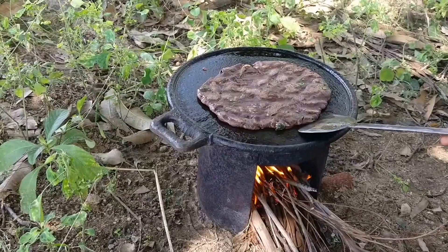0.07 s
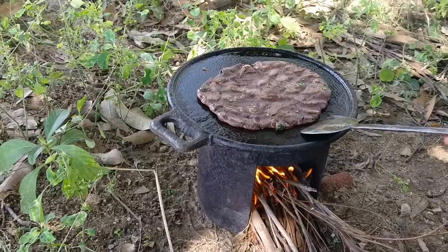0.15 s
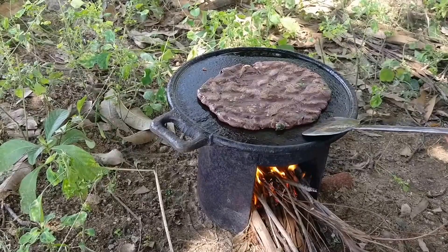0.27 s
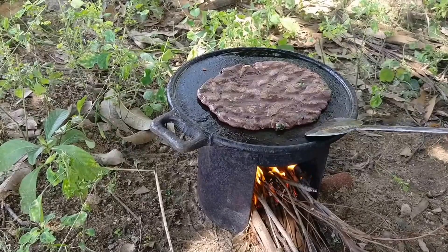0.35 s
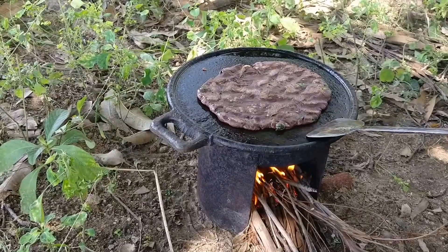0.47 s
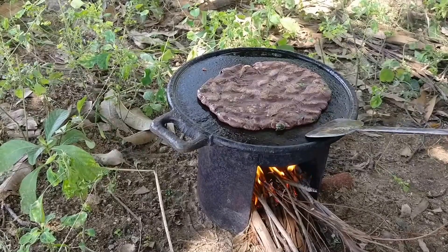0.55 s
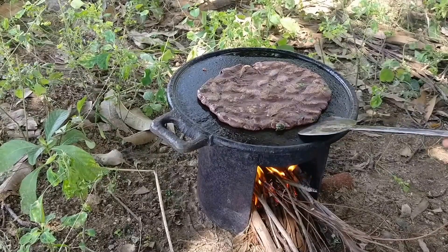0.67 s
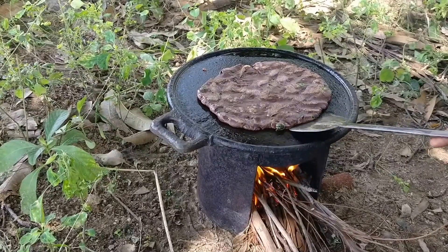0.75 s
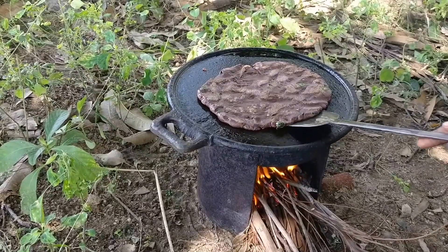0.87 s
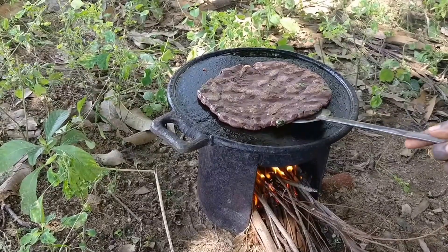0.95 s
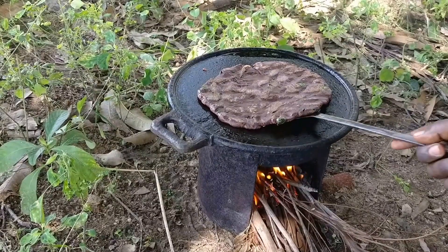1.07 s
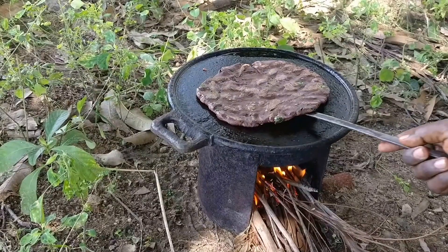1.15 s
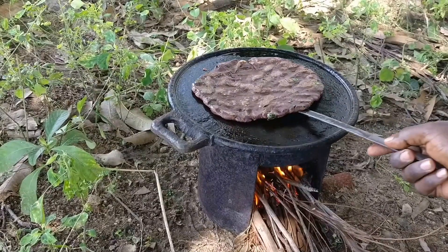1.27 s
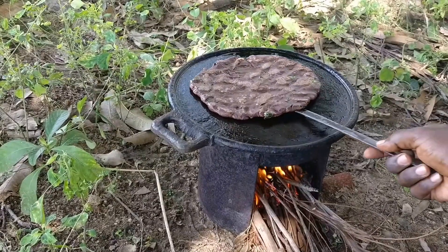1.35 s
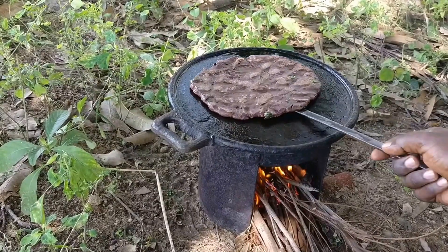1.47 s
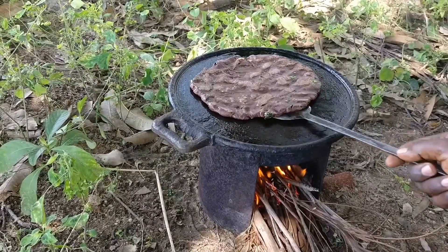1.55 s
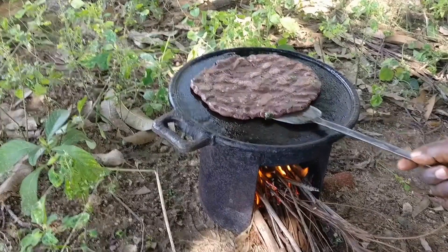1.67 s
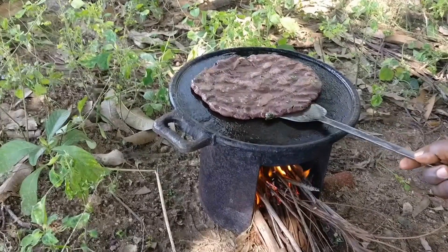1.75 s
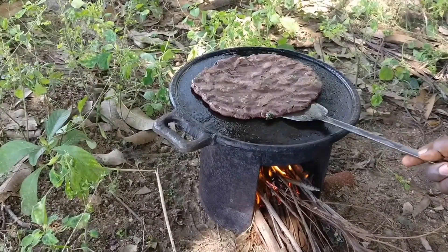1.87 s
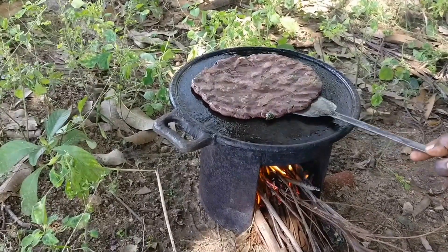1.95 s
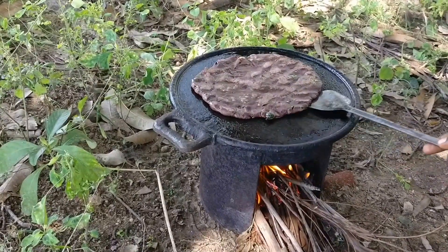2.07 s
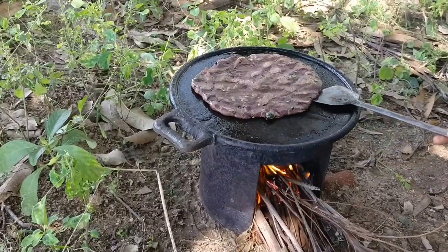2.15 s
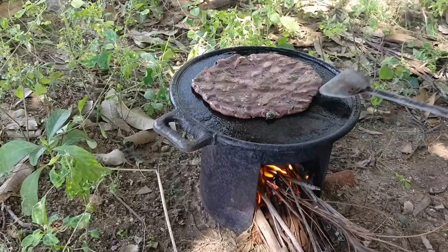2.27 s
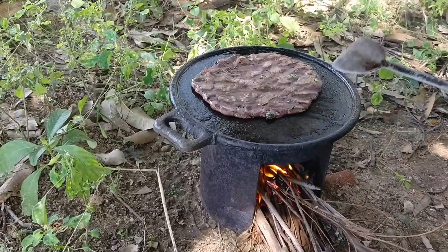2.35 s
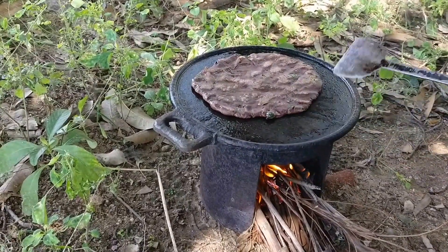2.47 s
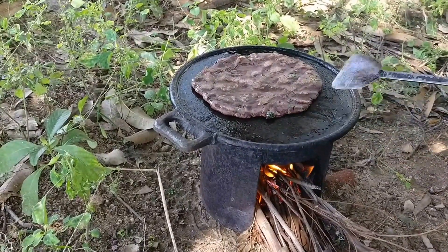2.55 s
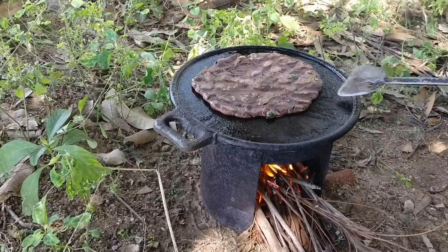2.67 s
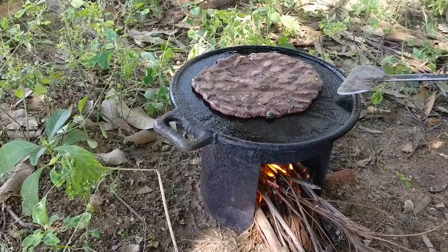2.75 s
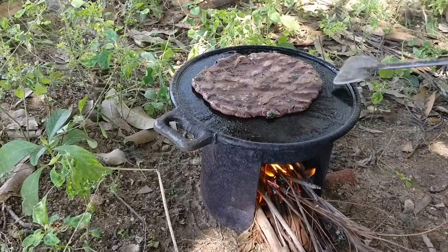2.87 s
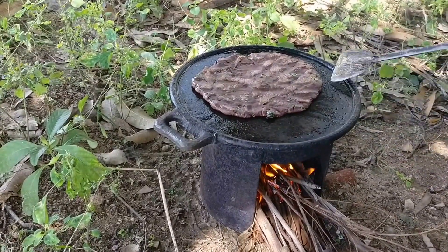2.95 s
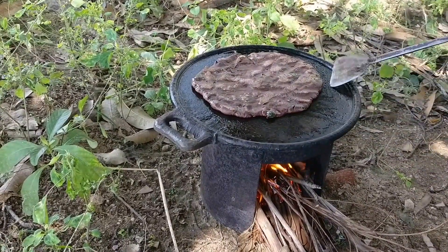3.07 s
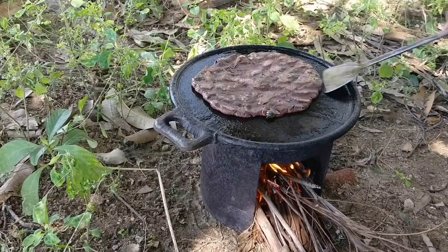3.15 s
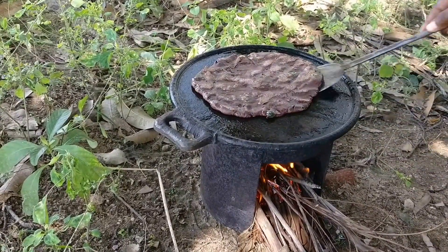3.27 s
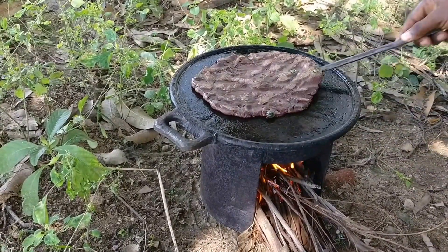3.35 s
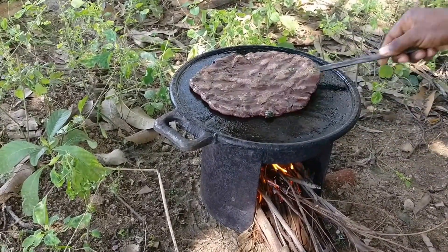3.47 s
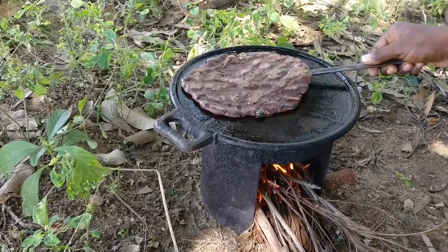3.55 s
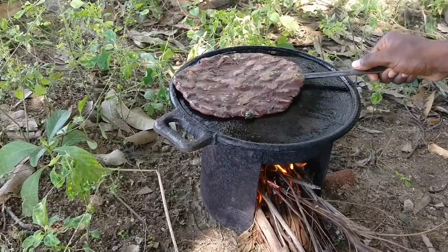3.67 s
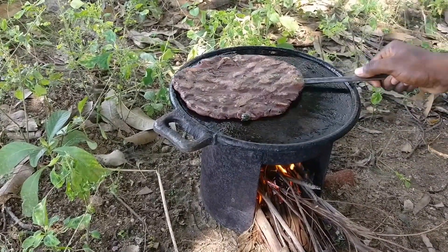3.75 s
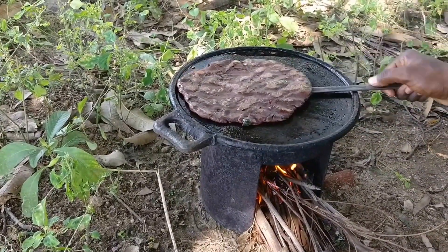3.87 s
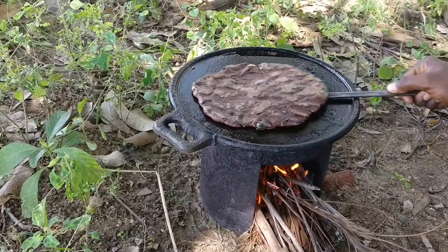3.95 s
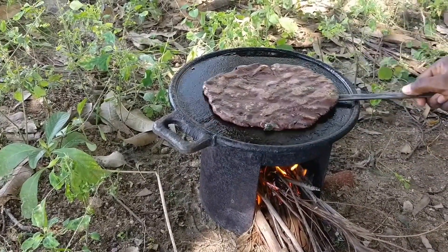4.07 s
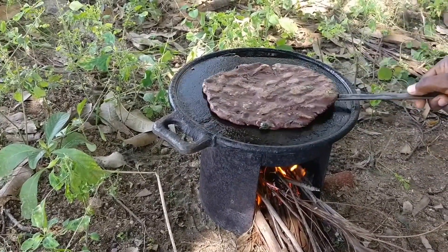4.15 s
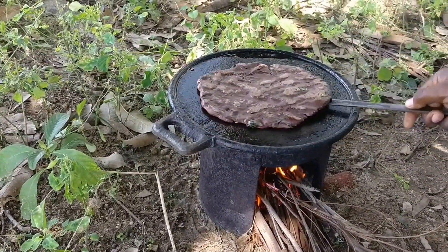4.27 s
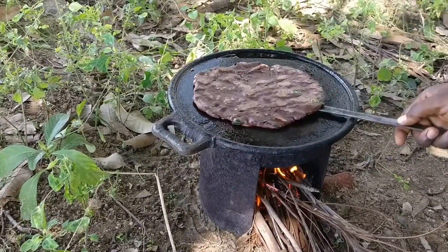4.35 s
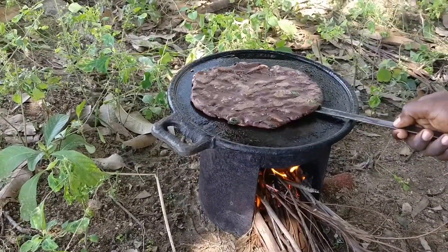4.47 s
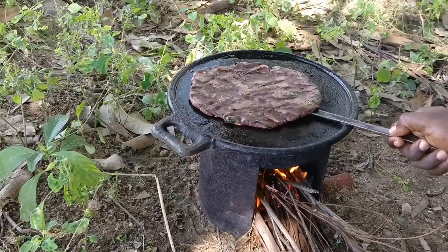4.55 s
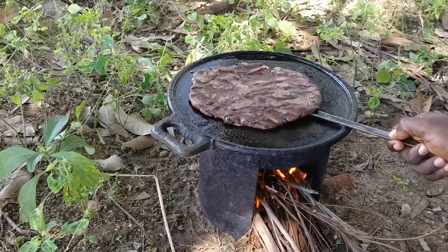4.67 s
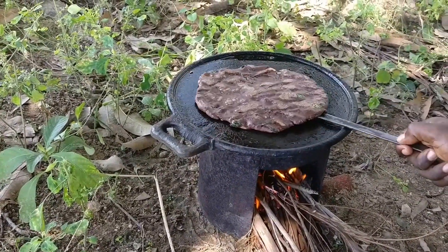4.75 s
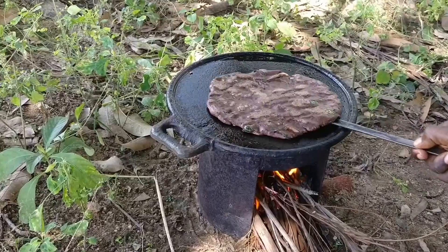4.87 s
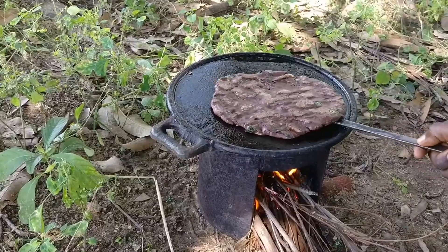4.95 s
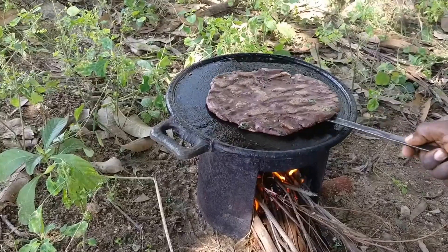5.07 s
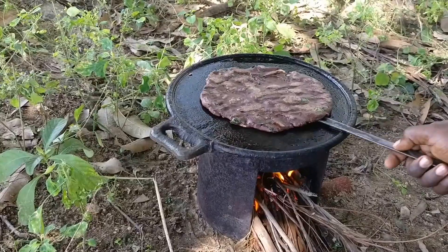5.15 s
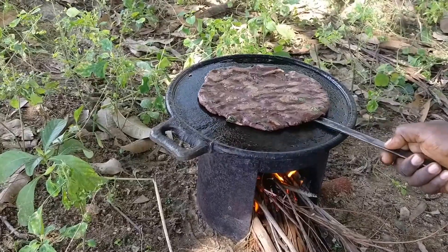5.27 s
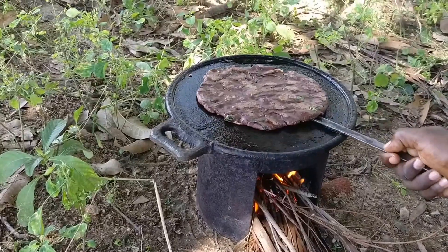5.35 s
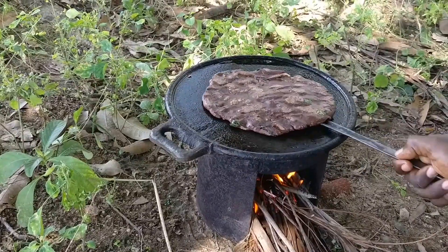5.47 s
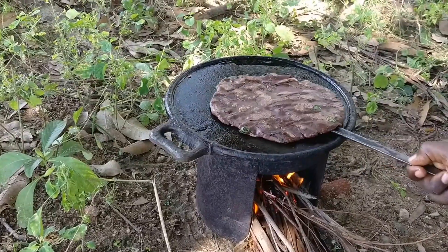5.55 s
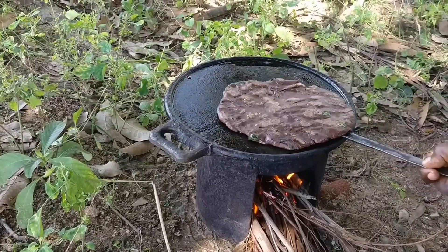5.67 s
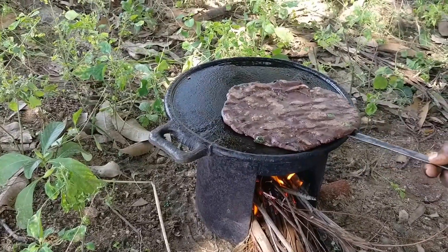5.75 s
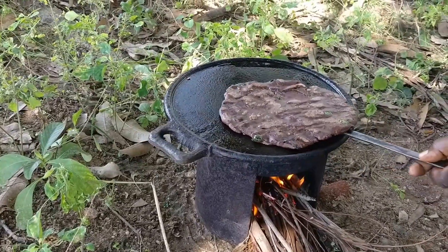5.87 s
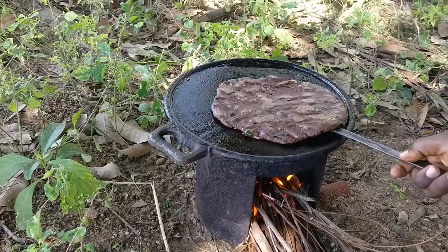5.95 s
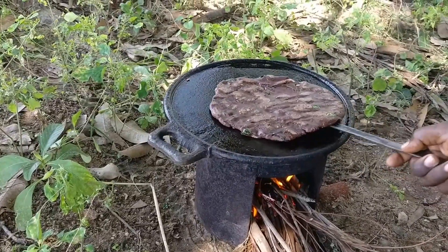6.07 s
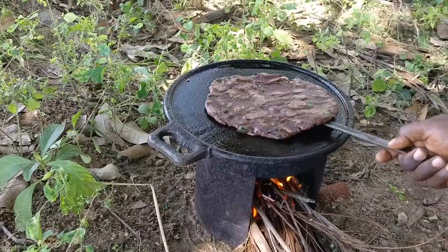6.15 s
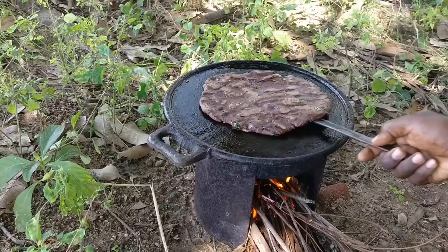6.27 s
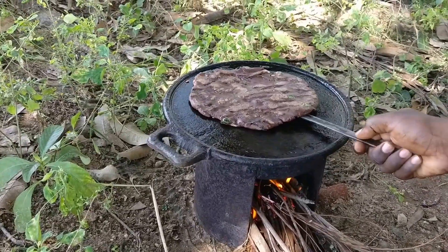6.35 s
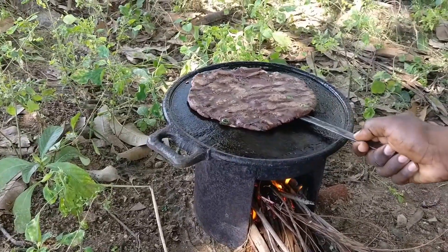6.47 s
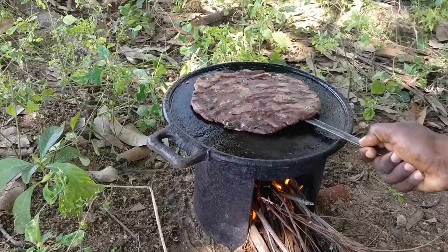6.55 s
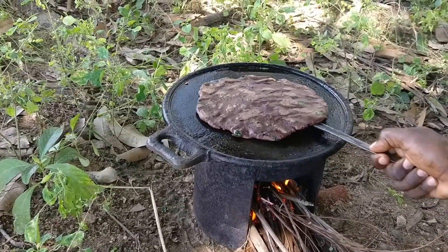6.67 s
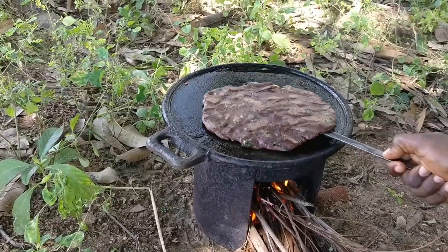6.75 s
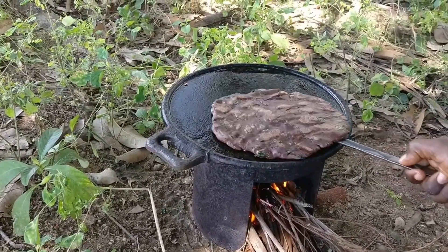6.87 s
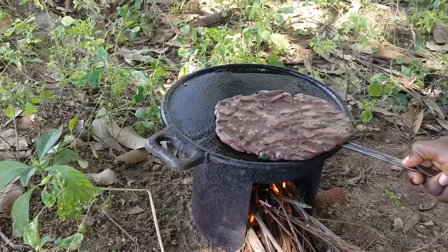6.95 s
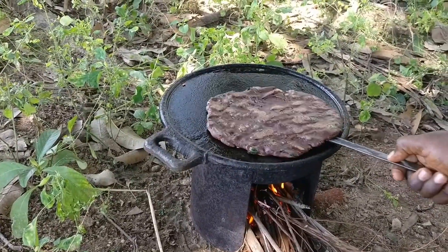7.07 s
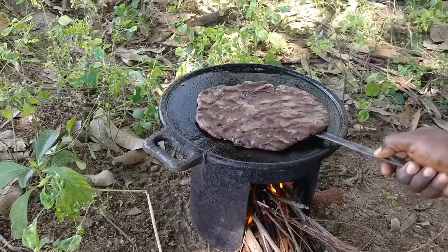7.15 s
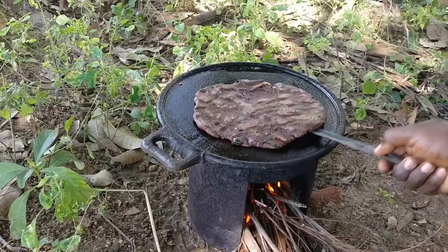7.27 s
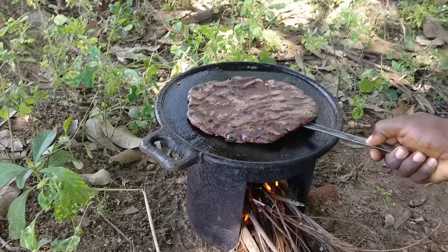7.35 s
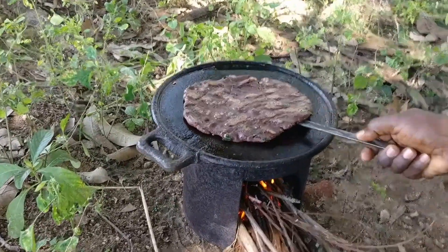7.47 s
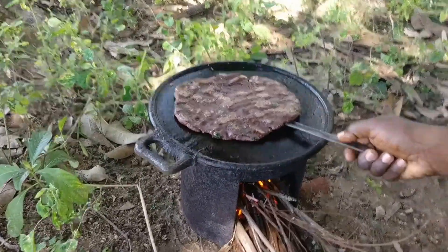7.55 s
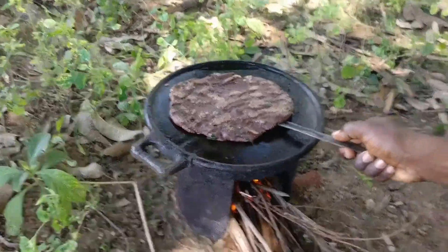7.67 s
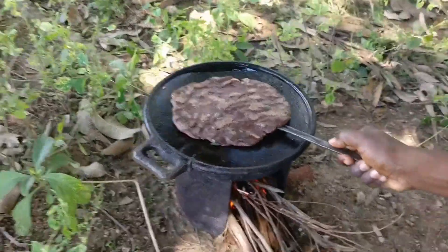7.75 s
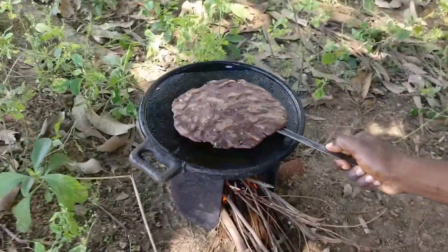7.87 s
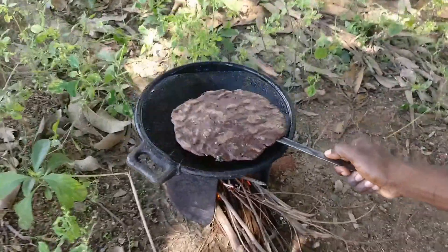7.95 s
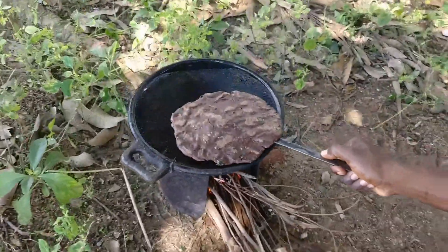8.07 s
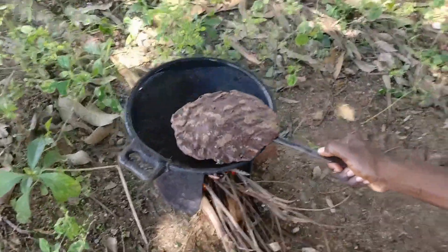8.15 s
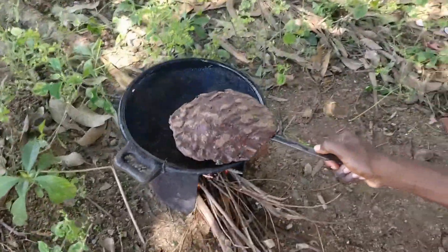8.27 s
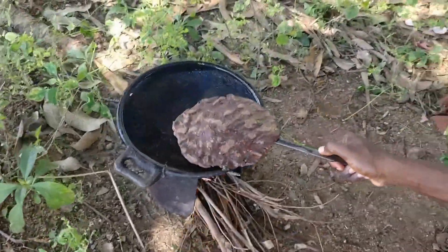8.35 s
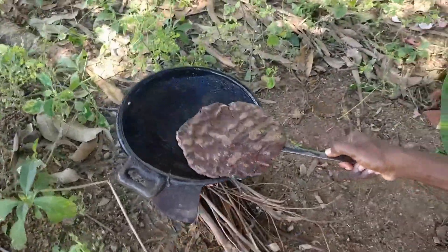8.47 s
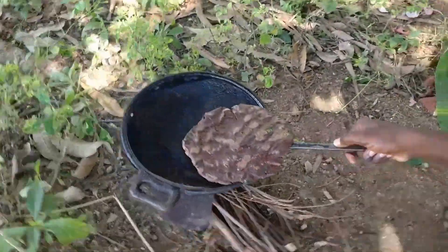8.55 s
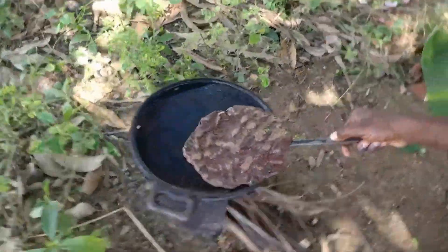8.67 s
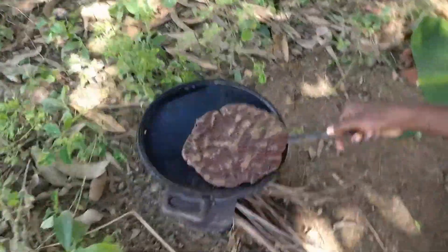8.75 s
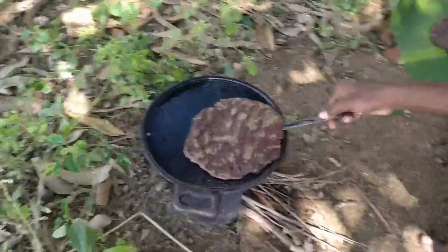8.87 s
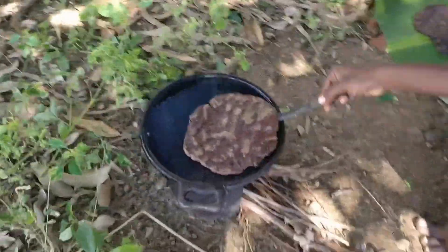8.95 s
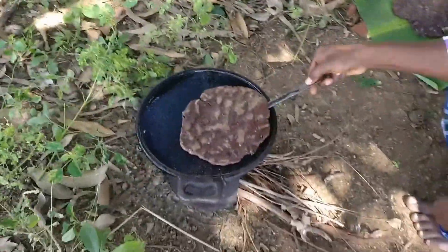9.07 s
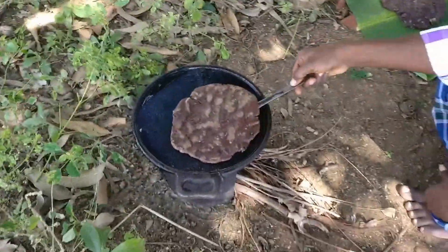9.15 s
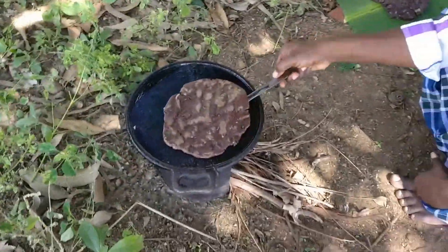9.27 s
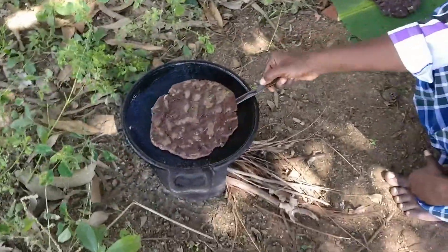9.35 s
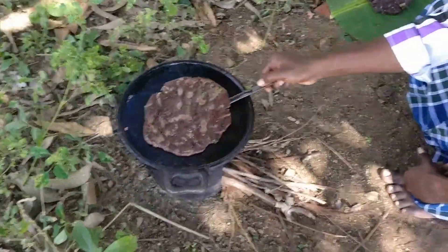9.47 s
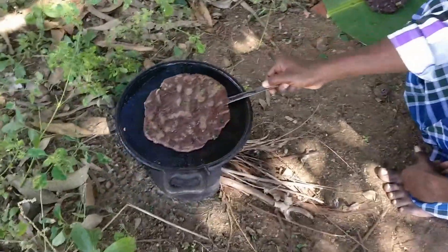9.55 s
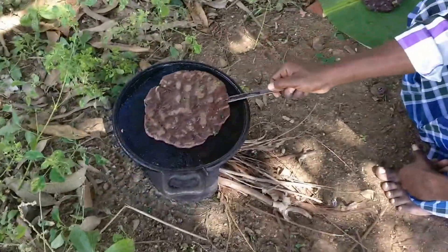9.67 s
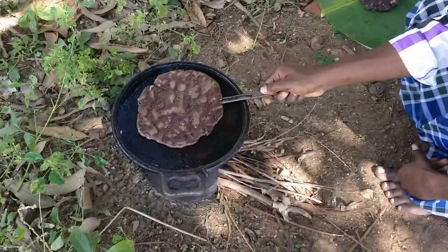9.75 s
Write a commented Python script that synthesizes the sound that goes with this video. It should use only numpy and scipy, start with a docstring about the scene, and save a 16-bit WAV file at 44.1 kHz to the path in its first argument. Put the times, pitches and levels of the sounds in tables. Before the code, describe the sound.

A steel spatula scrapes and knocks on an iron griddle outdoors, over a faint sizzle and sharp snaps of dry burning sticks.

```python
"""Dry sticks snap and litter rustles over a faint sizzle; then a steel spatula scrapes and knocks on an
iron griddle, turning a flatbread over a stick fire outdoors. Far off a motor hums and a bird whistles.
Scrapes are stick-slip noise through the metal's modes, knocks short noise bursts through the same modes.
Snaps, bumps, rustles and sizzle are shaped noise, bursting blisters are decaying sines;
bird and blade squeals are gliding sines."""
import sys
import numpy as np
from scipy import signal
from scipy.fft import rfft, irfft, next_fast_len
from scipy.io import wavfile

SR = 44100
rng = np.random.default_rng(int(sys.argv[2]) if len(sys.argv) > 2 else 0)


def store_wav(level_fs):
    """Save 16-bit WAV to argv[1]."""
    pcm = np.round(np.clip(np.atleast_2d(level_fs), -1, 1) * 32767)
    wavfile.write(sys.argv[1], SR, pcm.T.astype(np.int16))


N = 433062
TIME = np.arange(N) / SR
TOP_HZ = 16050


def undb(db):
    """Decibels to gain."""
    return 10 ** (np.asarray(db) / 20)


def unit(x):
    """Scale to rms 1."""
    return x / np.sqrt(np.mean(x ** 2))


def curves(rows):
    """Each column of a timed table, interpolated sample by sample."""
    s, *columns = np.transpose(rows)
    return [np.interp(TIME, s, column) for column in columns]


def colour(x, points):
    """Causal minimum-phase filter with the given (Hz, dB) response, built from its cepstrum."""
    size = next_fast_len(x.shape[-1] + 4096, True) // 2 * 2
    hz, db = np.transpose(points)
    bins_hz = np.fft.rfftfreq(size, 1 / SR)
    log_gain = np.log(undb(np.interp(np.log(bins_hz + 1), np.log(hz), db)))
    cepstrum = irfft(log_gain)[:size // 2]
    cepstrum[1:] *= 2
    response = np.exp(rfft(cepstrum, size))
    return irfft(rfft(x, size) * response)[..., :x.shape[-1]]


def band(x, hz, kind, order=3):
    """Butterworth filter."""
    return signal.sosfilt(signal.butter(order, hz, kind, fs=SR, output="sos"), x)


def walk(rate_hz):
    """Random curve of spread near 1, joining rate_hz random points a second by straight lines."""
    return 1.2 * np.interp(TIME * rate_hz, np.arange(4096), rng.standard_normal(4096))


def grains(spread_db):
    """Mid and side streams of dense tiny clicks whose sizes scatter exponentially in dB."""
    size = np.minimum(rng.exponential(size=N), 8)
    return unit(rng.standard_normal((2, N)) * undb(spread_db * size))


def excite(force, response):
    """Convolve a force with a mid and side impulse response."""
    return signal.oaconvolve(force[None], response, axes=1)[:, :len(force)]


def add(out, s, sound):
    """Mix a short sound in at time s."""
    i = int(s * SR)
    out[:, i:i + sound.shape[-1]] += sound[..., :N - i]


def swells(rows, attack_s, release_s, arch_db):
    """Gain of each band as events build, hold and die away; later columns are relative to the level."""
    power = np.zeros((len(rows[0]) - 2, N))
    for s, hold_s, db, *relative_db in rows:
        near = slice(max(0, int((s - .2) * SR)), int((s + hold_s + .4) * SR))
        t = TIME[near] - s
        shape = np.exp(np.minimum(t, 0) / attack_s - np.maximum(t - hold_s, 0) / release_s)
        shape = shape * undb(arch_db * np.sin(np.pi * np.clip(t / hold_s, 0, 1)))
        power[:, near] += np.outer(undb(db + np.array([0, *relative_db])), shape) ** 2
    return np.sqrt(power)


def tones(rows):
    """Short gliding sines that swell and fade, with an unsteady pitch."""
    out = np.zeros((2, N))
    for s, length_s, start_hz, end_hz, db, waver in rows:
        n = int(length_s * SR)
        hz = np.linspace(start_hz, end_hz, n) * (1 + waver * walk(396)[:n])
        phase = 2 * np.pi * np.cumsum(hz) / SR
        envelope = np.sqrt(2) * signal.windows.tukey(n, .5)
        add(out, s, undb(db) * envelope * np.array([np.sin(phase), np.cos(phase)]))
    return out


# Open-air spectrum. Each row: frequency in Hz, gain in dB.
AIR_TONE = [(12, -63), (20, -52), (42, -9.5), (65, 1), (192, -8.5), (229, -18), (310, -22.5), (352, -35.5),
            (454, -25.5), (507, -29), (614, -29), (644, -24.5), (900, -56), (1170, -69), (1980, -120)]


def open_air(level_db=-57.5, gust_s=8.88, width_s=1, rise_db=3.7):
    """Low rumble of the open air: coloured noise with one gust."""
    gust_db = rise_db * np.exp(-((TIME - gust_s) / width_s) ** 2)
    return unit(colour(rng.standard_normal((2, N)), AIR_TONE)) * undb(level_db + gust_db)


# Far motor. Each row: time in seconds, mean firing rate in Hz, relative level in dB.
MOTOR = [(0, 31.34, -103), (2.6, 30.8, -79), (3.2, 32.63, -68.5), (4.4, 33.72, -64), (5.5, 34.59, -62.5),
         (6.1, 33.37, -61.5), (6.8, 32.75, -75.5), (8.6, 34.37, -102), (9.5, 36.1, -72.5)]
# Motor harmonics. Each row: multiple of the firing rate, mean relative level in dB.
MOTOR_ORDERS = [(4, -9), (5, 3), (6, -3), (7, -11)]


def motor():
    """Far motor: harmonics of a drifting firing rate, each wavering in level."""
    hz, db = curves(MOTOR)
    phase = 2 * np.pi * np.cumsum(hz * (1 + 0.007 * walk(13))) / SR
    hum = sum(np.sin(round(k) * phase) * undb(order_db + 2.9 * walk(6)) for k, order_db in MOTOR_ORDERS)
    return hum * undb(db) * np.array([[1], [0]])  # mid only


# Bird notes. Each row: start in seconds, length in seconds, start in Hz, end in Hz, level in dB,
# pitch waver as a fraction.
WHISTLES = [(2.358, .06, 1420, 1590, -62, .008), (2.52, .085, 1930, 2050, -65, .008),
            (2.69, .16, 1190, 1680, -66, .1), (2.76, .04, 1430, 1600, -70, .02),
            (3.055, .075, 1490, 1510, -61, .012)]


def bird():
    """A far bird's whistles: gliding sines."""
    return tones(WHISTLES)


# Litter shifts. Each row: start in seconds, hold in seconds, relative level in dB,
# treble relative to it in dB.
RUSTLES = [(0.15, 0.21, -60.5, 6), (1.66, 0.6, -64, 11.5), (2.04, 0.17, -53.5, 1), (2.218, 0.016, -58, 1),
           (2.322, 0.054, -56.5, 12.5), (2.45, 0.097, -64, 11), (7.378, 0.025, -52.5, 10.5),
           (7.41, 0.022, -48.5, 1.5), (7.722, 0.024, -49.5, 1.5), (7.862, 0.088, -45, -4),
           (7.894, 0.016, -36, -1), (7.957, 0.0021, -41.5, -15), (8.038, 0.03, -50, -10),
           (8.09, 0.11, -59, 0)]
# Litter spectrum. Each row: frequency in Hz, gain in dB.
LITTER_TONE = [(180, -59), (300, -18), (2070, -1.5), (2210, -3), (2400, -1.5), (2880, 0.5), (4370, 0),
               (7570, -7.5), (10900, -3.5), (16000, -15.5)]


def rustles(gain_db=-1, crisp_db=-2, attack_s=0.025, release_s=0.013, arch_db=0.5):
    """Dry leaves and soil crush in a dense crackle, with sparser crisp ticks on top."""
    crackle = colour(grains(spread_db=-1.5) * undb(1.7 * walk(200)), LITTER_TONE)
    ticks = colour(grains(spread_db=3.0) * undb(2.8 * walk(350)), LITTER_TONE)
    low = unit(band(crackle, [400, 7500], "band"))
    high = unit(band(ticks, 13600, "high"))
    crush, crisp = swells(RUSTLES, attack_s, release_s, arch_db)
    return undb(gain_db) * (crush * low + undb(crisp_db) * crisp * high)


# Soft bumps. Each row: start in seconds, thud peak in dB, tick peak in dB.
BUMPS = [(0.385, -47, -60), (1.6615, -41, -22), (5.325, -58, -26), (4.578, -56, -36), (7.449, -43, -38),
         (7.662, -52, -46), (8.52, -47, -60)]


def bumps(decay_s=0.022, tick_s=0.0013):
    """A small tick with a dull thud behind it: two decaying noise bursts."""
    out, t = np.zeros((2, N)), TIME[:SR // 5]
    for s, thud_db, tick_db in BUMPS:
        thud = band(rng.standard_normal((2, len(t))) * np.exp(-t / decay_s), [60, 240], "band", order=2)
        tick = band(rng.standard_normal((2, len(t))) * np.exp(-t / tick_s), [350, 4200], "band", order=2)
        thud = undb(thud_db) * thud / np.abs(thud).max()
        tick = undb(tick_db) * tick / np.abs(tick[0]).max()
        add(out, s, thud + tick)
    return out


# Frying. Each row: time in seconds, relative level in dB.
FRYING = [(0, -55.5), (1.7, -55.5), (2.5, -56.5), (3.1, -51), (4.0, -53.5), (5.55, -51), (8.3, -54.5),
          (9.82, -48.5)]
# Sizzle spectrum. Each row: frequency in Hz, gain in dB.
SIZZLE_TONE = [(290, -61), (500, -18), (1060, 0.5), (1160, 2.5), (1720, -2), (1840, 1), (2690, 1),
               (4150, 4), (5470, -1.5), (6230, -4), (9090, -7), (15100, 2.5), (16000, -24)]


def sizzle(gain_db=-5.0, flutter_db=1.0):
    """Tiny steam bubbles burst under the dough: coloured, fluttering grains."""
    fizz = colour(grains(spread_db=0.5), SIZZLE_TONE) * undb(flutter_db * walk(35))
    return unit(fizz) * undb(curves(FRYING)[0] + gain_db)


def pops(count=1300, spread_db=4.6, cycles=1.6):
    """Larger blisters burst at random, each a decaying sine of its own pitch, size and side share."""
    out, t, frying_db = np.zeros((2, N)), TIME[:SR // 200], curves(FRYING)[0]
    for when, pitch, size, angle in rng.random((count, 4)):
        hz = np.interp(pitch, [0, .5, 1], [2200, 6000, 15500])
        db = frying_db[int(when * N)] + spread_db * (min(-np.log(1 - size), 4) - 1)
        tick = np.exp(-t * hz / cycles) * np.sin(2 * np.pi * hz * t)
        add(out, when * N / SR, undb(db) * np.outer([1, np.cos(2 * np.pi * angle)], tick))
    return out


# Stick snaps. Each row: start in seconds, peak in dB, woody share in dB relative to the fibre crack.
SNAPS = [(0.185, -19, -10), (0.224, -25, -9), (0.2452, -10, -4), (2.114, -15, -10), (2.117, -22, -15),
         (2.221, -18, -20), (2.272, -30.5, -11), (2.317, -14, -20), (2.338, -18, -27), (2.385, -27, -17),
         (2.5649, -15, -19.5), (2.975, -29, -24), (2.988, -36, -12), (4.057, -16, -13), (5.087, -14, -20),
         (5.0925, -11, -24), (5.3255, -12, -36), (5.329, -9.5, -41), (5.6508, -19.5, -18),
         (6.248, -14, -11.5), (6.561, -35, -20), (6.735, -32, -20), (7.896, -14, 11), (7.959, -21, 10),
         (8.032, -27, -9), (8.039, -21.5, -3), (8.0985, -42, 10), (8.4806, -6.5, -13)]
# Fibre crack spectrum. Each row: frequency in Hz, gain in dB.
SNAP_TONE = [(300, -18.5), (1500, -36), (5000, -9), (8000, -11.5), (11000, -2.5), (15500, 2.5)]
# Woody spectrum. Each row: frequency in Hz, gain in dB.
WOOD_TONE = [(200, -78), (700, -15), (1600, -2.5), (3000, 4), (5500, 0), (8000, -21), (15000, -56)]


def snaps(crack_s=.00024, wood_s=.0008, splinter_s=.003, splinter_db=-17, scatter_s=.022, scatter_db=-31,
          left_db=-12, tick_count=14, tick_db=-36, tick_spread_db=6, tick_wood_db=-20):
    """A fibre breaks on the right; the stick sounds, splinters follow, the ground scatters the sound."""
    out, t = np.zeros((2, N)), TIME[:SR // 8]
    tail = undb(splinter_db) * np.exp(-t / splinter_s) + undb(scatter_db) * np.exp(-t / scatter_s)
    aim = undb([[left_db], [0]])
    # faint extra snaps at random moments
    ticks = [(when * N / SR, tick_db + tick_spread_db * size, tick_wood_db)
             for when, size in rng.random((tick_count, 2))]
    for s, db, wood_db in list(SNAPS) + ticks:
        noise = np.sign(rng.standard_normal((2, 2, len(t))))
        fibre = colour(noise[0] * (aim * np.exp(-t / crack_s) + tail), SNAP_TONE)
        stick = colour(noise[1] * (aim * np.exp(-t / wood_s) + tail / 2), WOOD_TONE)
        crack = band(unit(fibre) + undb(wood_db) * unit(stick), TOP_HZ, "low")
        add(out, s, undb(db) * crack / np.abs(crack).max())
    return out


# Blade squeals. Each row: start in seconds, length in seconds, start in Hz, end in Hz, level in dB,
# pitch waver as a fraction.
SQUEALS = [(3.302, .045, 1760, 1800, -41, .012), (3.368, .04, 1873, 1873, -37.5, .025),
           (3.369, .045, 2606, 2606, -37.5, .025), (3.412, .045, 1880, 1890, -36, .01),
           (3.465, .05, 4180, 3980, -38, .045)]


def squeals():
    """The edge catches and squeals: gliding sines."""
    return tones(SQUEALS)


# Crowded lesser modes between the main ones. Each row: frequency in Hz, gain in dB.
RASP_TONE = [(250, -37), (380, -6.5), (540, -6.5), (680, 0), (950, 4), (1500, -3), (2200, 2.5), (3000, 5),
             (3500, 3.5), (4500, 1), (5600, -13), (7500, -5), (11000, -1), (15500, -1.5)]


def overtones(low_s=0.0015, high_s=0.011):
    """A fresh random impulse response of the crowded lesser modes; the high ones ring on longer."""
    t = TIME[:SR // 5]
    noise = rng.standard_normal((2, len(t)))
    low = band(noise * np.exp(-t / low_s), 3300, "low") / np.sqrt(low_s)
    high = band(noise * np.exp(-t / high_s), 2200, "high") / np.sqrt(high_s)
    out = colour(low + high, RASP_TONE)
    return out / np.sqrt(np.sum(out[0] ** 2))


# Plate and blade modes. Each row: frequency in Hz, nominal width in Hz (scaled by `narrow`),
# then relative level in dB with the edge on its tip, wedged under the dough, lying flat, on the rim.
METAL = [(443, 26, -7, -7, -7, -11), (627, 39, -15, -18, -17, -22), (794, 36, -11, -10, -12, -5),
         (1112, 30, 0, -2, -2, -10), (1191, 82, -8, -9, -8, -17), (1292, 29, -9, -5, -2, -8),
         (1708, 22, -2, -3, -6, -5), (1785, 35, -9, -13, -13, -14), (1879, 14, -9, -3, -2, -3),
         (2013, 13, -17, -12, -8, -11), (2105, 87, -16, -17, -18, -16), (2272, 90, -17, -14, -12, -18),
         (2620, 19, -4, -11, -4, 3), (2814, 36, -6, -5, -4, -10), (2925, 90, -8, -10, -15, -14),
         (3019, 24, -3, -9, -17, -1), (3106, 85, -11, -5, -14, -16), (3285, 67, -21, -6, -14, -23),
         (3492, 16, -11, -9, -5, -4), (3709, 22, -7, -8, -6, -3), (3792, 19, -2, -5, -2, -4),
         (4014, 34, -6, -7, -6, -8), (4185, 20, -6, -24, -6, -5), (4397, 51, -11, -19, -16, -10),
         (4547, 37, -12, -16, -14, -18), (4675, 90, -20, -20, -22, -15), (4967, 20, -14, -13, -12, -15),
         (5140, 78, -11, -25, -18, -28), (5281, 36, -5, -6, -9, -9), (5379, 58, -18, -14, -16, -6),
         (5585, 90, -16, -27, -17, -20), (5760, 26, -11, -6, -11, -11), (5855, 32, -22, -27, -17, -16),
         (6132, 90, -18, -32, -17, -19), (6325, 90, -22, -40, -24, -37), (6516, 36, -30, -17, -16, -12),
         (6822, 90, -21, -16, -15, -15), (7143, 90, -17, -7, -15, -20)]


def ring(narrow=0.9):
    """Mid and side impulse response, blade flat; modes differ in sign and phase between mid and side."""
    t, out = TIME[:SR // 2], 0
    for k, (hz, width_hz, _, _, flat_db, _) in enumerate(METAL):
        decay = np.exp((2j * np.pi * hz - np.pi * width_hz * narrow) * t)
        z = (-1) ** k * undb(flat_db) * width_hz * decay
        out = out + np.array([z.real, (-1) ** (k // 2) * z.imag])
    return out / np.sqrt(np.sum(out[0] ** 2))


# Blade strikes. Each row: start in seconds, level in dB, treble trim in dB, low body trim in dB.
KNOCKS = [(0.866, -33.5, -19.5, -27), (2.308, -38.5, -10, -23), (3.027, -33.5, -2, -11),
          (3.117, -27.5, -8, -19), (3.127, -30, -8, -31), (3.311, -26, 2, -19), (3.892, -41, -19, -9),
          (3.97, -37.5, -3, -3), (4.057, -24.5, 2, -10), (4.407, -37, -2, 4), (4.578, -38.5, -42, -14),
          (4.897, -36, -5.5, -16), (5.185, -35, -11, -3), (5.712, -30, -9, -14.5), (6.085, -32.5, -15, -26),
          (6.941, -18.5, -15, -27.5), (7.263, -33, -16, -18), (7.039, -29, -21, -46), (7.659, -48, -14, 4),
          (8.094, -37, -9, -24), (8.474, -28.5, -31, -22), (8.477, -21.5, 13, -39), (8.522, -24.5, 6, -67),
          (9.26, -28.5, -2, -14)]
# Free blade's ring. Each row: frequency in Hz, relative level in dB, 60 dB decay time in seconds.
PING = [(3494, -20, .23), (3709, -22, .19), (3790, -24, .15)]


def knocks(contact_s=0.0028, rattle_s=0.0045, hard_db=-16):
    """The blade lands with a brief chatter; its free ping takes a larger share of hard blows."""
    out, t, plate = np.zeros((2, N)), TIME[:SR // 3], ring()
    blade = sum(undb(db - 60 * t / t60_s) * np.exp(2j * np.pi * hz * t) for hz, db, t60_s in PING)
    for s, db, treble_db, low_db in KNOCKS:
        noise = rng.standard_normal((2, len(t)))
        force = unit(noise[0] * np.exp(-t / contact_s))
        chatter = unit(noise[1] * np.exp(-t / rattle_s))
        hit = excite(force, plate) + excite(chatter, overtones())
        hit = colour(hit, [(200, low_db - 4), (420, low_db + 21.5), (700, low_db + 20.5), (1400, 0),
                           (4500, treble_db + 10.5), (14000, treble_db + 3.0)])
        ping = undb((db - hard_db) / 2) * np.array([blade.imag, blade.real])
        add(out, s, undb(db) * (hit / np.abs(hit[0]).max() + ping))
    return out


def stick_slip(median_rate_hz=340, scatter=.7, spread_db=2.8, crunch_s=.0011, slide=.5):
    """Uneven jerks of the dragged edge, each a brief crunch of grit, over a light steady slide."""
    chance = rng.standard_normal((N // 100, 2))
    times_s = np.cumsum(np.exp(scatter * chance[:, 0])) / median_rate_hz
    jerks = np.bincount((times_s * SR).astype(int), undb(spread_db * chance[:, 1]), N)[:N]
    crunch = unit(signal.lfilter([1], [1, -np.exp(-1 / (crunch_s * SR))], jerks))
    return unit(grains(spread_db=2.0) * (crunch + slide))


# How the edge bears. Each row: time in seconds, position (0 tip, 1 wedged under the dough, 2 flat, 3 rim).
CONTACT = [(0.6, 0), (2.3, 0), (3.1, 1.9), (3.65, 2), (4.1, 1), (5.3, 0.8), (5.75, 2), (7.7, 2), (8.6, 3),
           (9.82, 3)]


def rubbed(slips, wander_db=2.8, wander_hz=11, narrow=0.6, loose_hz=50, bend=.018, size=64):
    """Slips drive each mode by how the edge bears and a wandering contact point; broad modes bend in pitch."""
    position = curves(CONTACT)[0][::size]  # gains step every `size` samples
    turns = TIME[::size] * wander_hz
    out, power = np.zeros((2, N)), 0
    for k, (hz, width_hz, *bearing_db) in enumerate(METAL):
        pole = np.exp((2j * np.pi * hz - np.pi * width_hz * narrow) / SR)
        wander = np.interp(turns, np.arange(128), rng.standard_normal(128))
        gain_db = np.interp(position, np.arange(4), bearing_db) + wander_db * wander
        gain = (-1) ** k * width_hz * undb(gain_db)
        z = signal.lfilter([1], [1, -pole], slips * np.repeat(gain, size)[:N])
        if width_hz > loose_hz:
            z = z * np.exp(2j * np.pi * hz * bend * np.cumsum(walk(16)) / SR)
        power += np.mean(gain ** 2) / (1 - abs(pole) ** 2) / 2
        out[0] += z.real
        out[1] += (-1) ** (k // 2) * z.imag
    return out / np.sqrt(power)


# Blade pushes. Each row: start in seconds, hold in seconds, relative level in dB,
# then low body, sharpness and gritty treble, each relative to it in dB.
PUSHES = [(0.656, 0.52, -54.5, -12.5, -6, -6.5), (0.868, 0.007, -40, -18, -6, -9.5),
          (0.915, 0.091, -48.5, -12.5, -5, -7), (0.992, 0.092, -43, -12.5, -0.5, -9),
          (1.072, 0.045, -41, -11.5, -5, -6.5), (1.155, 0.071, -39, -10, -7, -12),
          (1.276, 0.006, -36, -11, -2, -9), (1.462, 0.071, -44, -10, 1, -9.5),
          (1.556, 0.062, -41, -12.5, 2.5, -5), (1.695, 0.042, -47.5, -12, 0, -1),
          (1.924, 0.058, -48, -14, -0.5, -8.5), (2.043, 0.075, -41, -12.5, 2, -5),
          (3.152, 0.071, -47, -12.5, -0.5, -7), (3.255, 0.11, -37, -12, -5, -9.5),
          (3.347, 0.092, -33, -6.5, 0, -8.5), (3.461, 0.056, -33.5, -12.5, 0.5, -6.5),
          (3.571, 0.046, -42.5, -11.5, -8, -20), (3.735, 0.39, -56, -12, -2.5, -6.5),
          (4.158, 0.11, -50, -6, -3.5, -10), (4.226, 0.12, -47, -15, -4.5, -13),
          (4.411, 0.0048, -52, -22, 0, -7), (4.504, 0.011, -52.5, -4.5, -7, -14),
          (5.012, 0.095, -45, -9, -4, -13.5), (5.128, 0.05, -47.5, -17, -2.5, -11),
          (5.285, 0.014, -51.5, -8.5, -1.5, -16), (5.72, 0.056, -50, -11.5, -12, -13),
          (5.902, 0.05, -34, -15.5, -4.5, -12), (6.103, 0.026, -40.5, -12.5, -2, -11),
          (6.247, 0.015, -31.5, -11, 1.5, -5.5), (6.32, 0.033, -42, -11, -1.5, -21),
          (6.982, 0.028, -43, -13, -12, -18), (7.046, 0.073, -37.5, -14.5, -6, -12),
          (7.209, 0.021, -49, -6.5, -4, -14), (7.28, 0.027, -40, -6, -3, -8),
          (7.489, 0.024, -33.5, -9, -6, -11.5), (8.506, 0.018, -42, -14, 2, -6),
          (8.655, 0.092, -43, -7.5, -3.5, -7.5), (8.858, 0.013, -50, -2, -6.5, -22),
          (8.993, 0.012, -40, -12, -4, -9), (9.078, 0.039, -39, -10, -2, -7.5),
          (9.192, 0.0094, -48.5, -11, -13, -27), (9.277, 0.028, -32, -13, -5, -7.5),
          (9.415, 0.0067, -38, -17.5, -5.5, -12.5), (9.571, 0.034, -35, -14, -4.5, -16),
          (9.723, 0.053, -40.5, -10, -2, -14.5)]


def scrapes(rasp_db=-1.5, body_db=9.5, mid_db=-0.5, sharp_db=5.0, grit_db=6.5,
            attack_s=0.02, release_s=0.029, arch_db=-2):
    """Each push drags the edge over the rough iron; plate and blade ring on when it lets go."""
    slips = stick_slip()
    forces = swells(PUSHES, attack_s, release_s, arch_db)
    parts = [([1000, 4300], mid_db), ([200, 950], body_db), ([4300, 7500], sharp_db), ([8000, 16500], grit_db)]
    drive = sum(force * undb(db) * band(slips, edges_hz, "band", order=6)
                for force, (edges_hz, db) in zip(forces, parts))
    metal = rubbed(drive[0])
    touches_s = [push[0] - 2 * attack_s for push in PUSHES] + [N / SR]
    for start_s, end_s in zip(touches_s, touches_s[1:]):
        # each push is rasped through a fresh random draw of crowded lesser modes
        force = drive[1, int(start_s * SR):int(end_s * SR)]
        add(metal, start_s, undb(rasp_db) * excite(force, overtones()))
    return metal


# Stereo width. Each row: frequency in Hz, gain of the side signal in dB.
WIDTH = [(60, -15), (250, -10.5), (600, -8), (1300, -3.5), (2500, -1), (15000, -1.5)]
# Stereo tilt. Each row: frequency in Hz, left minus right in dB.
TILT = [(200, -1), (700, -1), (1300, -2), (2400, -4.5), (4400, 2), (8000, -5), (15000, -11)]


def scene():
    """Sources as mid and side, spread to left and right; the snaps join as left and right."""
    background = open_air() + motor() + bird() + rustles() + bumps()
    spatula = squeals() + knocks() + scrapes()
    mid, side = background + sizzle() + pops() + spatula
    side = colour(side, WIDTH)
    left = colour(mid + side, [(hz, db / 2) for hz, db in TILT])
    right = colour(mid - side, [(hz, -db / 2) for hz, db in TILT])
    return np.array([left, right]) + snaps()


def record(dry):
    """The recorder cuts steeply above TOP_HZ."""
    return signal.sosfilt(signal.ellip(10, .2, 80, TOP_HZ, fs=SR, output="sos"), dry)


dry = scene()
out = record(dry)
store_wav(out)
```